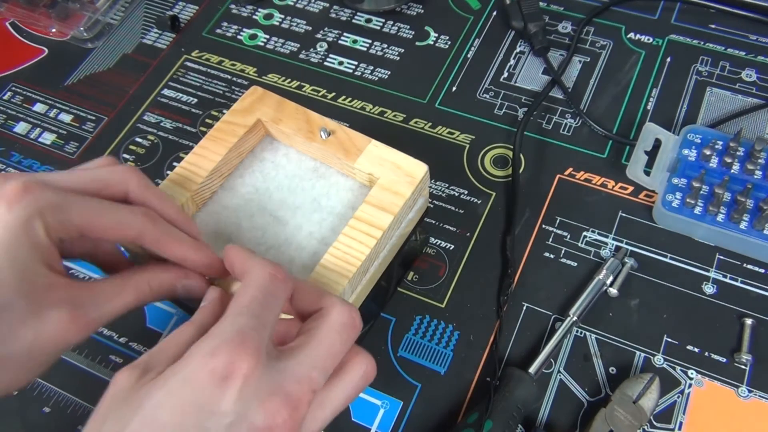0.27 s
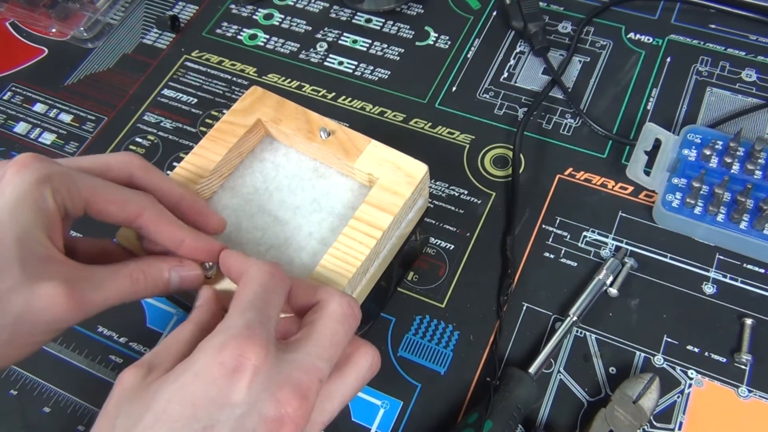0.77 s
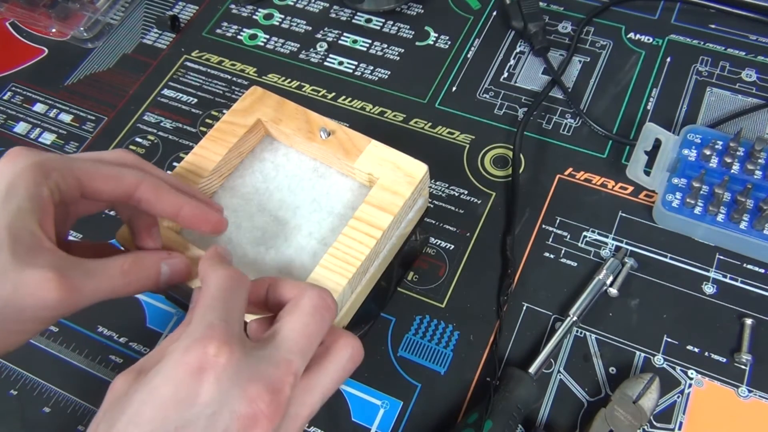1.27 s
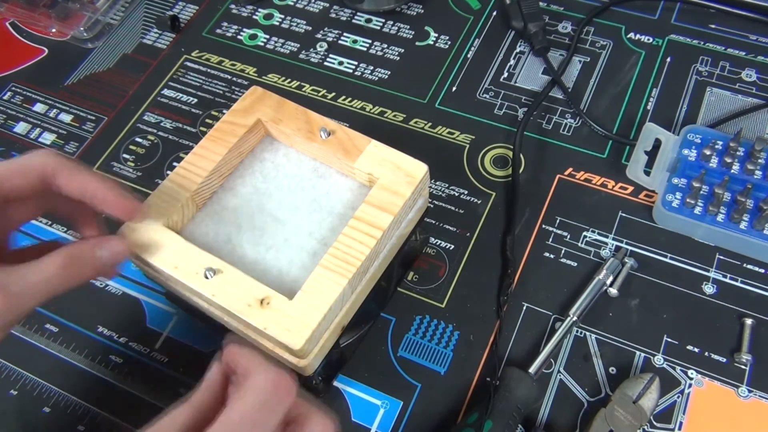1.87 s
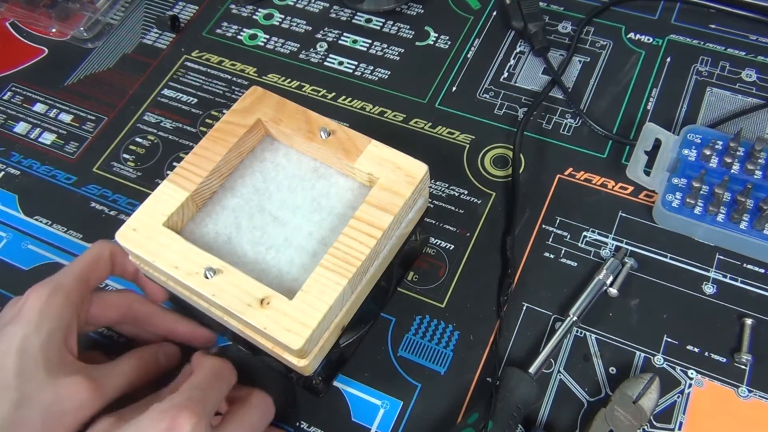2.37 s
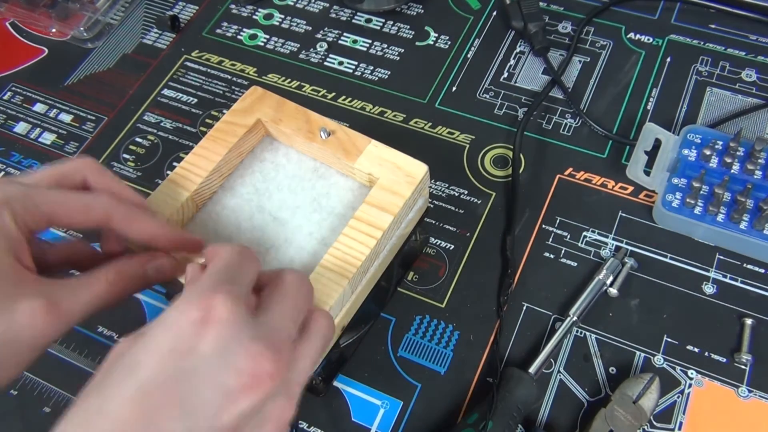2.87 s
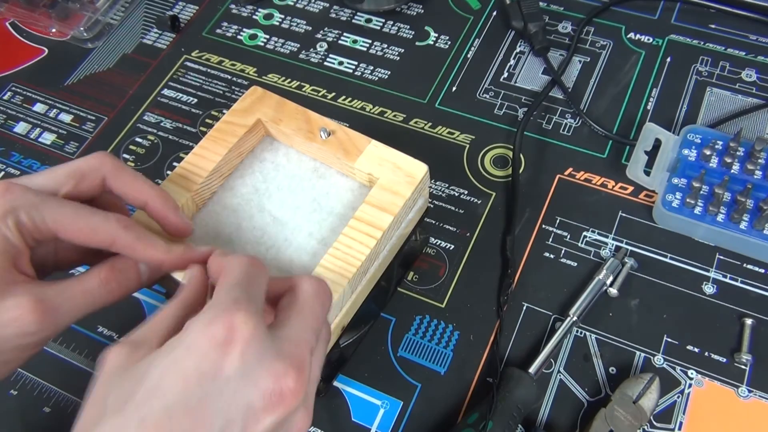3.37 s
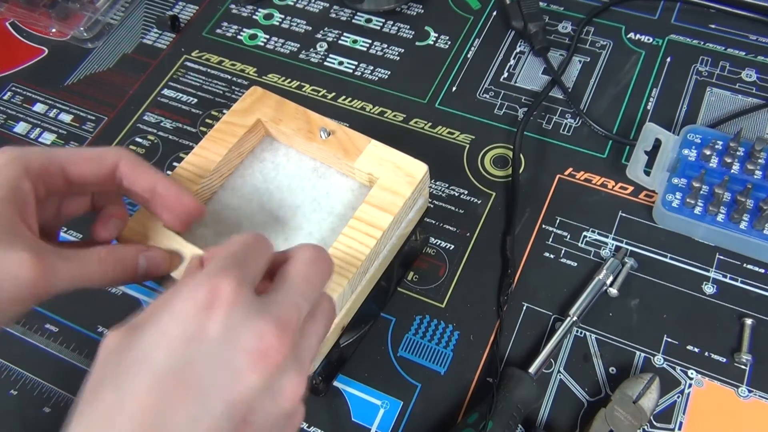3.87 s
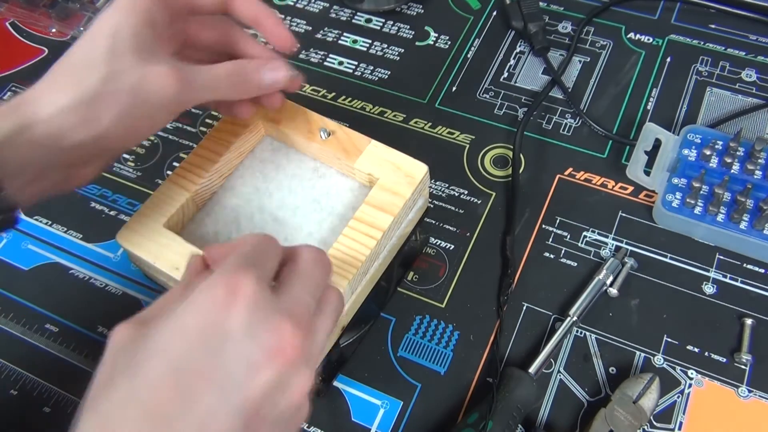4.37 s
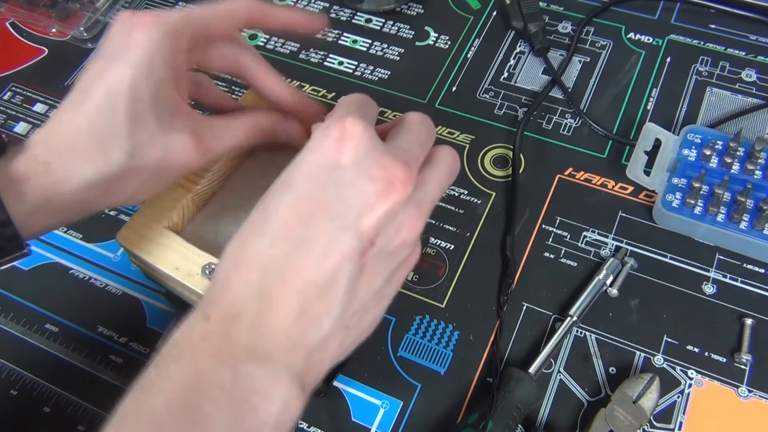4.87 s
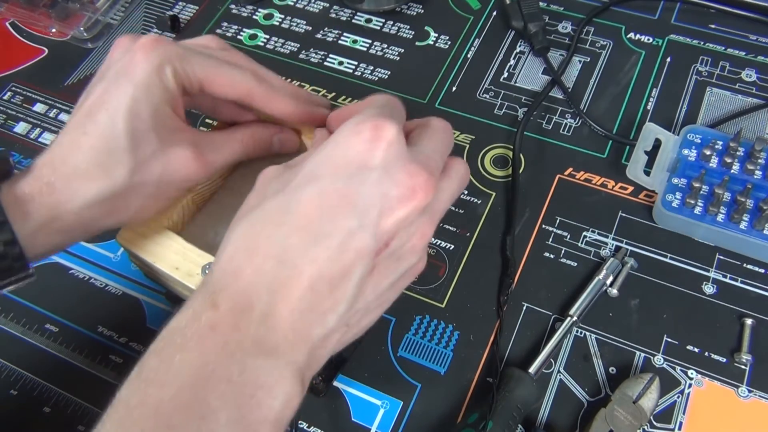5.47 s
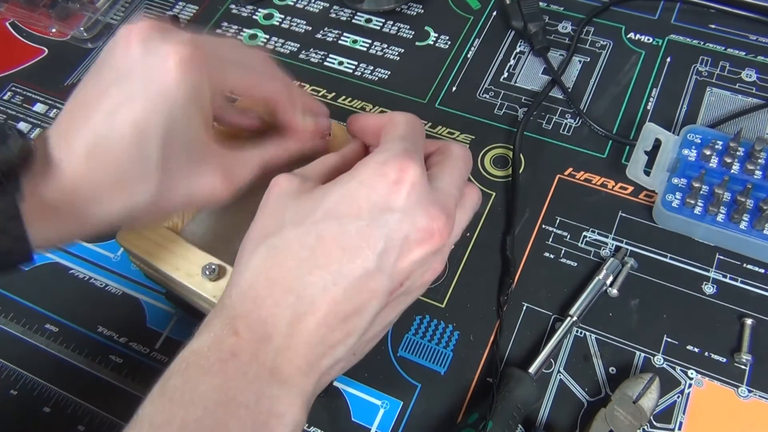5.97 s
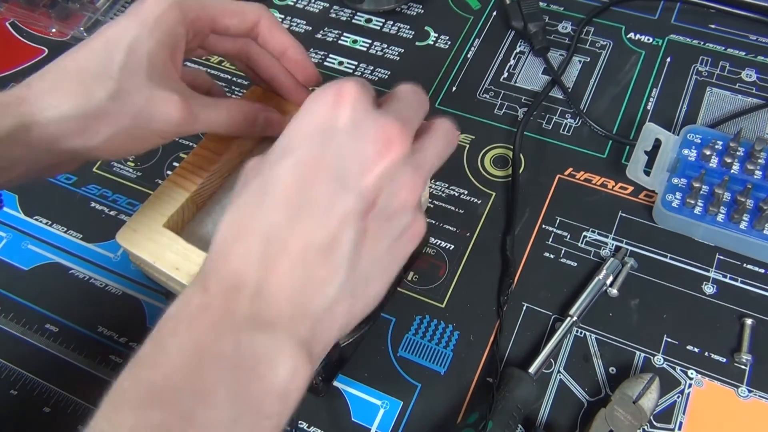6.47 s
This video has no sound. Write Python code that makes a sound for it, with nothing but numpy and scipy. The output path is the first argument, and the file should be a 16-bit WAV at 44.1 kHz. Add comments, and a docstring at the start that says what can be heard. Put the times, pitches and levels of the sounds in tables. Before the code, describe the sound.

Small steel nuts click sharply against bolts as fingers fit them to a wooden frame, with brief metallic rings and soft thumps on a padded workbench. The frame claps down on its base and loose metal jangles. Softer clicks, ticks and short thread scrapes follow. The work is close to the microphone in a small room, and a fan hums on the left, getting quieter partway through.

```python
"""Fingers fit small steel nuts onto bolts in a wooden frame on a padded workbench, while a fan hums. At first
the nuts click loudly on the bolts, loose steel rings and the frame thumps the bench. At 1.6 s the frame claps
down on its wooden base. At 2.7 s the fan's hum and the room's echo abruptly sound fainter. Then come softer
clicks and short scrapes along the threads, and around 5.7 s a faint hiss swells and fades as the last nut
spins."""
import sys
import numpy as np
from scipy import signal
from scipy.fft import rfft, irfft, next_fast_len
from scipy.io import wavfile
from scipy.ndimage import uniform_filter1d

SR = 44100
rng = np.random.default_rng(int(sys.argv[2]) if len(sys.argv) > 2 else 0)


def wrap_up_sound(samples):
    """Save the sound to the file named by the first command line argument, as 16-bit audio."""
    columns = np.atleast_2d(samples).T
    # keep every value between -1 and 1, then stretch to whole-number steps
    tamed = np.clip(columns, -1, 1)
    steps = np.round(tamed * 32767).astype(np.int16)
    wavfile.write(sys.argv[1], SR, steps)


N = 297234
DROP_S = 2.732  # the hum and the echo abruptly sound fainter from here

# resonances (pitches it likes to ring at) of a steel bolt: f/Hz, width/Hz, level/dB
BOLT_MODES = [(1608, 450, -9.5), (1865, 110, 0), (2172, 172, -1.5), (2354, 140, 2), (2423, 260, -0.5),
              (3335, 400, -5), (3636, 340, -3.5), (4415, 340, -6.5)]
# resonances of the wooden frame: f/Hz, width/Hz, level/dB
FRAME_MODES = [(700, 120, -7), (836, 31, 4.5), (909, 134, 1), (1016, 110, 5), (1150, 150, -1),
               (1370, 23, -7)]


def nut_click(force_db, hard_db):
    """A nut snaps onto its bolt, rings it and knocks the wood; gentle hits are duller, soft ones woodier."""
    snap_db = force_db + hard_db
    wood_db = force_db - 0.72 * hard_db
    tip = lambda f: steel_snap(f) * dull(f, 20000 * amp(0.16 * snap_db))
    held = gripped_bolt(spread_db=2)
    shank = lambda f: held(f) * dull(f, 30000 * amp(0.17 * force_db))
    snap = amp(snap_db - 9) * strike(
        tip, t60=0.0088, scatter_db=-13.5, scatter_t60=0.03, rise_s=0.0013, apart=0.8)
    bolt = amp(force_db - 3) * strike(
        shank, t60=0.0038, scatter_db=-17.5, scatter_t60=0.045, rise_s=0.00074, apart=0.17)
    wood = amp(wood_db - 7) * strike(
        body(FRAME_MODES), t60=0.0024, scatter_db=-20, scatter_t60=0.0525, rise_s=0.0004, apart=0.99)
    graze = amp(-22) * snap  # a light touch just before the nut lands
    return graze + np.roll(snap + bolt + wood, round(GRAZE_S * SR), axis=1)


GRAZE_S = 0.0022  # time from that light touch to the full click


def nut_clicks():
    """Nuts click once as they land, or twice as they rock between the two sides of a loose thread."""
    # single hits, hard for steel on steel, soft for a knock on the frame: t/s, force/dB, hardness/dB
    hits = [(.0598, -36, -1.5), (.2105, -18.5, 12), (.2314, -35.5, -6), (.2399, -32, 8.5),
            (.3506, -23.5, 5), (.3749, -19, 12.5), (.3876, -21.5, 10), (.5005, -32, 3.5),
            (.5291, -24.5, 12), (.6593, -26.5, 4.5), (.7713, -29.5, 1.5), (.8281, -42.5, -14.5),
            (.9799, -34, -1.5), (1.1722, -39, 4), (1.2197, -18, 12), (1.227, -28, -3), (1.4441, -21, 10),
            (1.48, -27.5, 16), (1.4924, -30, -5.5), (1.6711, -18.5, 13.5), (1.825, -30.5, 6.5),
            (1.8921, -29.5, 5.5), (1.944, -31.5, 4.5), (2.023, -51.5, 17.5), (2.0418, -53.5, 16),
            (2.1438, -38.5, -4), (2.152, -39, 9), (2.162, -31, 5), (2.3312, -46, 4), (2.3667, -38, 3),
            (2.5054, -39, -11.5), (2.7211, -44, 11.5), (2.9543, -48.5, 1), (3.174, -51, 4),
            (3.2044, -53.5, -11.5), (3.2956, -58, -13), (3.36, -57, 9), (3.4052, -43, 8),
            (3.5859, -41.5, 9.5), (3.6716, -49, 5.5), (4.1976, -48, -8), (4.4817, -47.5, -14),
            (4.793, -45.5, 3.5), (4.9131, -48, 0), (5.3214, -57, -15), (5.3577, -48.5, 0.5),
            (5.4157, -37.5, 7.5), (5.4507, -52, 4), (6.124, -60, 10.5), (6.1983, -47.5, 4), (6.561, -37, 1)]
    # a nut rocking on its thread: t/s, force/dB
    catches = [(2.8781, -37.5), (3.0864, -35.5), (4.650, -51), (4.7259, -38.5), (5.117, -48), (5.226, -45),
               (5.4715, -46.5), (5.987, -33.5), (6.2476, -42.5)]
    rock_s = 0.0155
    track = np.zeros((2, N))
    for s, force_db, hard_db in hits:
        add(track, s - GRAZE_S, nut_click(force_db, hard_db))
    for s, force_db in catches:
        add(track, s - GRAZE_S, nut_click(force_db, hard_db=8))
        add(track, s - GRAZE_S + rock_s, nut_click(force_db + 0.5, hard_db=8))
    return track


def frame_claps():
    """Wood lands flat on wood: each touch is one sharp push, then a faint scatter."""
    # the frame meeting its base: t/s, level/dB
    touches = [(1.6406, -2), (1.6428, -6), (1.6438, -6.5), (1.6461, -10.5), (1.717, -15), (1.732, -17)]
    # tone colour of the clap: f/Hz, level/dB
    colour = [(60, -41.5), (150, -24.5), (280, -4.5), (400, -23.5), (630, -7), (850, -8), (1500, -6.5),
              (1900, -6.5), (2450, -11.5), (3000, -20), (3500, -20), (5600, -33), (12000, -38),
              (16000, -57)]
    track, t = np.zeros((2, N)), np.arange(SR // 8) / SR
    for s, db in touches:
        scatter = amp(-42.5) * rng.standard_normal((2, len(t))) * fade(t, 0.05)
        clap = filtered((t == 0) + scatter, lambda f: causal(amp(along(colour, f))))
        add(track, s, amp(db) * clap / np.abs(clap).max())
    return track


def loose_steel():
    """Steel that is free of the fingers rings on: a few clear tones over a jangle of countless others."""
    # each ring: t/s, clear level/dB, jangle level/dB, share of full length, focus/Hz, spread/octaves
    rings = [(0.209, -51.5, -50, .59, 8000, 2), (.376, -45.5, -36, .36, 5000, 2),
             (1.220, -53, -39, 1, 8000, 2), (1.478, -39.5, -52.5, 0.51, 6050, .048),
             (1.672, -27, -17.5, 0.99, 6000, 4.1), (1.894, -28, -45, 0.45, 2795, 1.55),
             (1.946, -31.5, -39, 0.52, 4300, 1.3), (2.367, -41.5, -42, 0.27, 4350, .6)]
    # tones of the steel: f/Hz, level/dB, fade time/s
    tones = [(2110, -1.5, 0.26), (2260, -4.5, .33), (2290, -5, .3), (2500, -3.5, .28), (2800, -9, 0.29),
             (3560, -12.5, .32), (3873, -6.5, .35), (3408, -11, 1.3), (4418, -7, .32), (7210, -5, .34),
             (11740, -6, .28), (4650, -5.5, .3), (6050, -20, 0.58), (6600, -6, .22), (7600, -13.5, .26),
             (8600, -4.5, .27), (8600, -6, .26), (9600, -8.5, .26), (9940, -14, .21), (11200, -10, .15)]
    track, t = np.zeros((2, N)), np.arange(SR * 2 // 3) / SR
    hz, db, t60 = np.transpose(tones)[:, :, None]
    for s, ring_db, jangle_db, share, focus_hz, octaves in rings:
        strength = amp(db) / (1 + (np.log2(hz / focus_hz) / octaves) ** 2)  # favours tones near the focus
        waves = np.sin(2 * np.pi * (hz * t + rng.random(hz.shape)))
        ring = np.sum(strength * fade(t, t60 * share) * waves, axis=0)
        add(track, s, amp(ring_db - 3.5) * ring / np.sqrt(np.sum(strength ** 2) / 2))
        noise = diffuse(rng.standard_normal((2, len(t))))
        high = unit(filtered(noise, steel_snap)) * fade(t, 0.33 * share)
        low = unit(filtered(noise, body(BOLT_MODES[2:]))) * fade(t, 0.38 * share)
        add(track, s, amp(jangle_db - 6) * (high + amp(-3.5) * low))
    return track


def thread_scrapes():
    """Threads catch and slip in short strokes; more pressure makes a stroke louder, denser and brighter."""
    # a nut turned on its thread or slid on wood: middle t/s, half length/s, level/dB
    strokes = [(0.751, 0.034, -48.5), (1.481, .01, -33), (2.165, .022, -42), (3.54, 0.014, -52.5),
               (3.616, .014, -25), (3.692, 0.0064, -41.5), (4.0, .025, -57), (4.186, .026, -48),
               (4.5, 0.015, -50), (4.666, 0.015, -48.5), (4.743, 0.017, -36.5), (4.885, 0.013, -39),
               (5.133, 0.024, -49), (5.189, 0.015, -45.5), (5.232, 0.0067, -43.5), (5.349, 0.021, -48),
               (5.418, 0.017, -39.5), (5.873, 0.019, -48), (6.001, 0.013, -35.5), (6.285, 0.024, -47.5),
               (6.391, 0.026, -53), (6.554, 0.012, -47), (6.676, 0.026, -47.5), (6.736, 0.0075, -41.5)]
    light_stroke_db = -49
    track, t = np.zeros(N), np.arange(-SR // 8, SR // 8) / SR
    for s, half_s, db in strokes:
        pressure_db = db - light_stroke_db
        slips_per_s = 600 * amp(0.7 * pressure_db)
        slips = grit(len(t), slips_per_s, bright_db=-6.5 + 0.33 * pressure_db, uneven_db=2.5)
        add(track, s + t[0], amp(db - 5) * slips * np.exp(-(t / half_s) ** 2))
    return track


def bench_thumps():
    """A mat softens the frame's blows on the bench; harder ones press through and sound higher."""
    # the frame set down or rocked on the mat: t/s, level/dB
    blows = [(.061, -39), (.211, -46.5), (.378, -44.5), (0.742, -47), (1.221, -53.5), (1.64, -44),
             (1.823, -51), (2.142, -39.5), (2.163, -41.5), (3.687, -51.5), (3.87, -60), (4.019, -61.5),
             (4.181, -55.5), (4.486, -55.5)]
    # resonances of the bench: f/Hz, width/Hz, level/dB
    bench_modes = [(60.2, 31, -4.5), (92, 43, 0.5), (122.1, 30, 0), (190.3, 82, -7), (315, 18, 2),
                   (494, 130, -3.5)]
    track = np.zeros((2, N))
    for s, db in blows:
        mat_hz = 89 * 2 ** ((db + 49) / 6)  # the mat lets an octave more through for every 6 dB
        bass_cut = lambda f: 1j * f / (1j * f + 0.25 * mat_hz)
        padded = lambda f: body(bench_modes)(f) * dull(f, mat_hz) * bass_cut(f)
        thump = strike(padded, t60=0.0013, scatter_db=-27.5, scatter_t60=0.068, rise_s=0.0006, apart=0.25)
        add(track, s, amp(db + 3) * thump)
    return track


def fingers():
    """While the fingers work a nut their tips rub softly and the thread ticks now and then."""
    # spells of rubbing: start/s, end/s, level/dB
    spells = [(.65, 0.954, -58), (1.957, 2.68, -57.5), (2.922, 3.55, -59.5), (4.621, 4.965, -52.5),
              (5.099, 5.5, -69)]
    ease_s, tick_gap_s = 0.03, 0.1
    ticks, grip, t = np.zeros((2, N)), np.zeros(N), np.arange(N) / SR
    rub = grit(N, slips_per_s=180, bright_db=-8.5, uneven_db=0)
    for start, end, db in spells:
        grip += amp(db) * np.clip(np.minimum(t - start, end - t) / ease_s + 0.5, 0, 1)
        for s in np.arange(start, end - tick_gap_s, tick_gap_s):
            tick_s = s + rng.random() * tick_gap_s
            add(ticks, tick_s, nut_click(force_db=-58 + 2 * rng.standard_normal(), hard_db=1))
    return ticks + amp(-8.5) * grip * rub


def spinning_nut():
    """A thin high hiss swells and fades while the last nut spins."""
    # pitch of the hiss: f/Hz, width/Hz, level/dB
    band = [(11560, 940, 0)]
    middle_s, half_s = 5.68, 0.58
    swell = np.exp(-((np.arange(N) / SR - middle_s) / half_s) ** 2)
    return amp(-75.5) * swell * steady_noise(lambda f: body(band)(f) ** 2)


def fan():
    """A fan on the left blows air and hums; it is louder and fuller before DROP_S."""
    # tone colour of the rushing air, early and late: f/Hz, level/dB
    early_air = [(15, -49), (25, -26.5), (170, -11), (373, -7.5), (545, -11), (641, -2), (734, -19),
                 (887, -8), (1100, -17.5), (1330, -4), (1440, -10.5), (1700, -11), (2160, -19),
                 (6740, -26.5), (16000, -32)]
    late_air = [(15, -50), (25, -15), (129, -3.5), (204, -13.5), (523, -10), (614, -7.5), (804, -40),
                (871, -4), (1080, -15.5), (1300, -12), (2010, -17.5), (2230, -17.5), (3630, -23),
                (15500, -33.5)]
    # humming resonances: f/Hz, width/Hz, level/dB
    hum = [(114, 6, -3), (172.8, 17, -7), (284, 30, -9), (628.3, 36, -6), (788, 150, -16), (1318.5, 33, -9)]
    # how far the sound leans left: f/Hz, left minus right/dB
    lean = [(300, 0.5), (700, 4), (1300, 6.5), (2400, 3), (8000, -0.5)]
    air = lambda colour: steady_noise(lambda f: amp(along(colour, f)))
    full = amp(-54) * air(early_air) + amp(-57.5) * steady_noise(body(hum))
    quiet = amp(-61.5) * air(late_air) + amp(-62) * steady_noise(body(hum))
    early = np.clip((DROP_S - np.arange(N) / SR) / 0.0042, 0, 1)
    to_left = lambda f: amp(np.array([along(lean, f), -along(lean, f)]) / 2)
    return filtered(early * full + (1 - early) * quiet, to_left)


def room(x):
    """The small room echoes from all sides; high pitches die away first."""
    # how long the echo lasts: f/Hz, fade time/s
    fade_times = [(100, 0.84), (600, 0.6), (2000, .42), (8000, 0.24), (12000, 0.2), (16000, 0.14)]
    hz, t, noise = signal.stft(rng.standard_normal((2, SR * 2 // 3)), SR, nperseg=256)
    build_up = 1 - np.exp(-t / 0.0038)
    fading = noise * fade(t, along(fade_times, hz)[:, None]) * build_up
    echo = diffuse(signal.istft(fading, SR, nperseg=256)[1])
    return signal.fftconvolve(x, echo / np.linalg.norm(echo[0]), axes=1)[:, :N]


def strike(response, t60, scatter_db, scatter_t60, rise_s, apart):
    """A burst of tiny hits and its scatter off hands and bench shake a body; apart widens the stereo."""
    t = np.arange(SR // 8) / SR
    burst = rng.standard_normal(len(t)) * fade(t, t60)
    scatter = rng.standard_normal(len(t)) + apart * rng.standard_normal((2, len(t)))
    force = (burst + amp(scatter_db) * scatter * fade(t, scatter_t60)) * (1 - np.exp(-t / rise_s))
    sound = filtered(force, response)
    power = uniform_filter1d(np.mean(sound ** 2, axis=0), size=132, mode="constant")  # over 3 ms
    return sound / np.sqrt(power.max())


def grit(count, slips_per_s, bright_db, uneven_db):
    """Tiny random slips shake bolt, nut and wood; soft ones lose their treble."""
    slips = (rng.random(count) < slips_per_s / SR) * rng.choice([-1, 1], count)
    sizes = amp(uneven_db * np.clip(rng.standard_normal(count), -2, 2))
    edge_hz = 11000 * amp(2.8 * bright_db)
    shake = lambda response: unit(filtered(slips * sizes, lambda f: response(f) * dull(f, edge_hz)))
    bolt = shake(gripped_bolt(spread_db=1.5))
    return bolt + amp(bright_db - 2) * shake(steel_snap) + amp(-10.5) * shake(body(FRAME_MODES))


def steel_snap(f):
    """Filter with the bright sound of steel meeting steel."""
    # tone colour of the snap: f/Hz, level/dB
    colour = [(1500, -45.5), (3600, -20.5), (5200, 0), (6400, -2.5), (7500, 2.5), (8600, 0), (9500, 2.5),
              (10400, -6), (12400, -4.5), (14200, -11), (16000, -22)]
    return causal(amp(along(colour, f)))


def gripped_bolt(spread_db):
    """The grip and the spot that is hit make each bolt resonance louder or softer every time."""
    return body([(hz, width, db + spread_db * rng.standard_normal()) for hz, width, db in BOLT_MODES])


def body(modes):
    """Filter for an object that rings at these resonances."""
    return lambda f: sum((-1) ** k * amp(db) * 1j * f * width / (hz * hz - f * f + 1j * f * width)
                         for k, (hz, width, db) in enumerate(modes))


def steady_noise(response):
    """Filtered noise from all sides, at average level 1."""
    return unit(diffuse(filtered(rng.standard_normal((2, N)), response)))


def diffuse(x):
    """Two unrelated signals become a pair that is alike in the bass and wide in the high treble."""
    # sound arriving from all sides: f/Hz, left-right likeness (1 = the same)
    likeness = [(60, 1), (300, 0.97), (1400, 0.74), (3100, 1), (7000, .6), (15000, .3)]
    angle = lambda f: np.arccos(np.clip(along(likeness, f), -1, 1)) / 2
    mid, side = filtered(x, lambda f: np.array([np.cos(angle(f)), np.sin(angle(f))]))
    return np.array([mid + side, mid - side])


def filtered(x, response):
    """Scale and delay each frequency f in x by response(f)."""
    n = x.shape[-1]
    padded = 2 * next_fast_len(n // 2 + 4096)
    return irfft(rfft(x, padded) * response(np.fft.rfftfreq(padded, 1 / SR)), padded)[..., :n]


def causal(gain):
    """Filter with this gain that never sounds before it is struck (minimum phase)."""
    cepstrum = irfft(np.log(np.maximum(gain, 1e-6)))
    half = len(cepstrum) // 2
    cepstrum[1:half] *= 2
    cepstrum[half + 1:] = 0
    return np.exp(rfft(cepstrum))


def dull(f, edge_hz):
    """Filter that softens everything above edge_hz."""
    return 1 / (1 + 1j * f / edge_hz) ** 2


def fade(t, t60):
    """A smooth fall, 60 dB down after the fade time t60."""
    return np.exp(-np.log(1000) * t / t60)


def along(points, hz):
    """Read between (Hz, value) points on a pitch scale."""
    f, values = np.transpose(points)
    return np.interp(np.log(hz + 1), np.log(f + 1), values)


def amp(db):
    """Decibels to gain."""
    return 10 ** (np.asarray(db) / 20)


def unit(x):
    """Scale x to an average (rms) level of 1."""
    return x / np.sqrt(np.mean(x ** 2) + 1e-20)


def add(track, s, sound):
    """Mix a sound into the track from time s."""
    part = track[..., max(round(s * SR), 0):][..., :sound.shape[-1]]
    part += sound[..., :part.shape[-1]]


def scene():
    """The work close by, its echo and the background; the echo is weaker after DROP_S."""
    background = fan() + spinning_nut()
    work = nut_clicks() + frame_claps() + loose_steel() + bench_thumps() + thread_scrapes() + fingers()
    echo_gain = np.where(np.arange(N) / SR < DROP_S, amp(-13), amp(-22))
    return work + room(echo_gain * work) + background


def record(dry):
    """Two microphones: the left is weak in bass and high treble; both cut off above top_hz."""
    # loudness difference between them: f/Hz, left minus right/dB
    balance = [(60, -15.5), (200, -13.5), (380, -11.5), (700, -4), (1200, -3.5), (2200, -0.3), (4400, -2),
               (8000, -1), (12000, -10), (15000, -13.5)]
    # timing difference between them: f/Hz, left ahead by/radians
    lead = [(100, 0.16), (400, .3), (1000, 0.45), (2200, -0.5), (4400, -0.72), (15000, -0.66)]
    top_hz = 15900

    def pair(f):
        ratio, turn = amp(along(balance, f)), np.exp(0.5j * along(lead, f))
        return np.array([ratio * turn, 1 / turn]) * 2 / (1 + ratio)
    return filtered(filtered(dry, pair), lambda f: 1 / np.sqrt(1 + (f / top_hz) ** 120))


dry = scene()
out = record(dry)
wrap_up_sound(out)
```